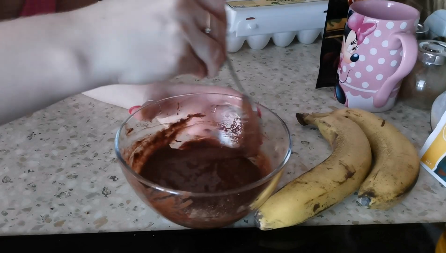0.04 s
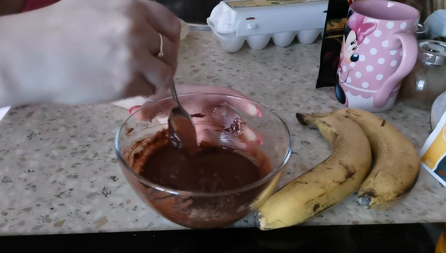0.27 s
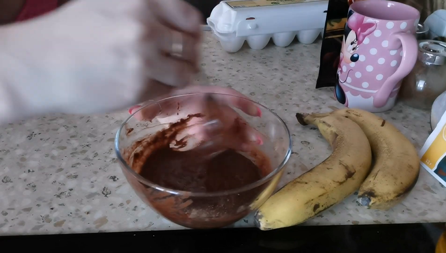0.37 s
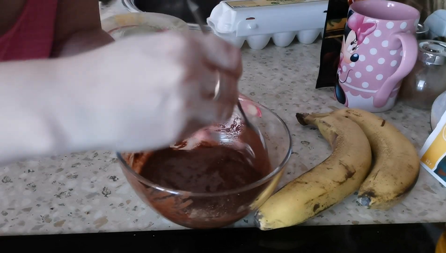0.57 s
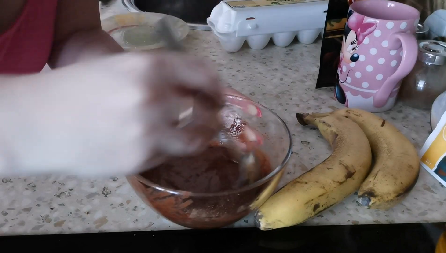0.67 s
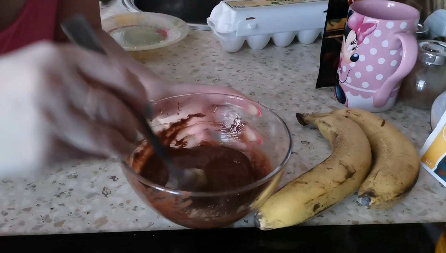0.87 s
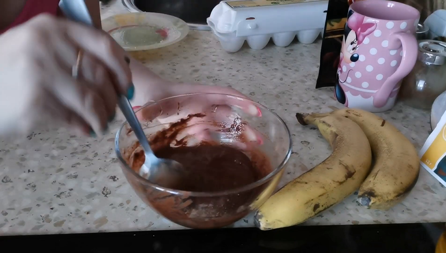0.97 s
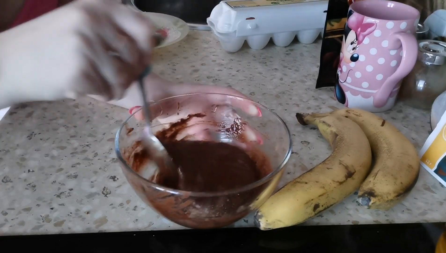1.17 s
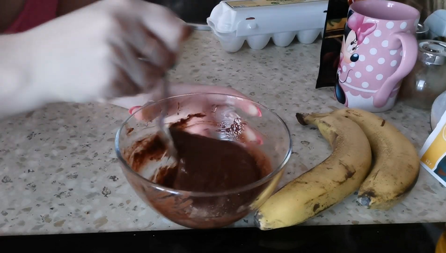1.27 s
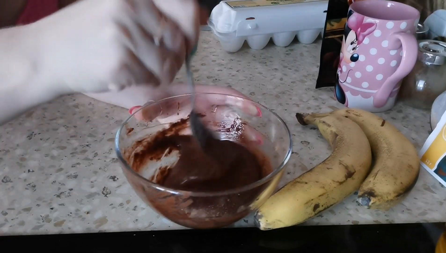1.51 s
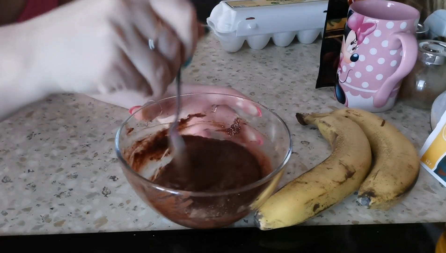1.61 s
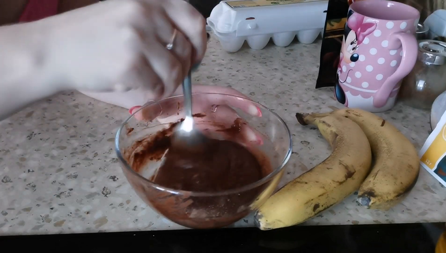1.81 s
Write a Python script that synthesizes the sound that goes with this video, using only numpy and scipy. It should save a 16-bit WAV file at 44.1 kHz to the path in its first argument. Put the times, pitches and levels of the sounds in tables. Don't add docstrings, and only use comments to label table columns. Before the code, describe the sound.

A metal spoon clinks on a glass bowl damped by batter: a sharp, bright knock at about 0.2 seconds, then a softer, duller one near 0.7, each with a short ring and kitchen reverberation. Tiny wet ticks come around 0.4, and faint scraping, rubbing and sticky ticks run from 0.8 to 1.45, nearly stopping before a last slight touch at 1.7. A low fridge-like hum continues underneath.

```python
import sys
import numpy as np
from scipy import signal
from scipy.fft import rfft, irfft
from scipy.io import wavfile
from scipy.ndimage import uniform_filter1d

SR = 44100
rng = np.random.default_rng(int(sys.argv[2]) if len(sys.argv) > 2 else 0)


def convert_level_to_amplitude(level_db):
    exponent = np.asarray(level_db, float) / 20
    return 10 ** exponent


def transcribe(signal):
    frames = np.atleast_2d(signal).T
    limited = np.clip(frames, -1, 1)
    pcm = np.round(limited * 32767).astype(np.int16)
    wavfile.write(sys.argv[1], SR, pcm)


N = 81585
FLICKER_DB = 1.2


def on_log(hz, table):
    tab = np.array(table, float)
    return np.interp(np.log(np.maximum(hz, 1)), np.log(tab[:, 0]), tab[:, 1])


def on_time(table):
    tab = np.array(table, float)
    return np.interp(np.arange(N) / SR, tab[:, 0], tab[:, 1])


def band(x, hz, width):
    return signal.lfilter(*signal.iirpeak(min(hz, SR / 2.2), hz / width, fs=SR), x)


def colour(x, table, size=1024):
    hz = np.arange(size // 2 + 1) * SR / size
    cepstrum = irfft(np.log(convert_level_to_amplitude(on_log(hz, table))))
    cepstrum[1:size // 2] *= 2
    cepstrum[size // 2 + 1:] = 0
    response = irfft(np.exp(rfft(cepstrum)))
    return signal.fftconvolve(x, response)[:len(x)]


def walk(rate):
    k = int(SR / rate)
    steps = np.repeat(rng.standard_normal(N // k + 1), k)
    return uniform_filter1d(uniform_filter1d(steps, k), k)[:N]


def pair(hz, size):
    alike = 0.67 / (1 + (hz / 355.8) ** 2)
    mid, side = rng.standard_normal((2, size))
    opposite = np.array([[1], [-1]])
    return (np.sqrt(1 + alike) * mid + np.sqrt(1 - alike) * side * opposite) / np.sqrt(2)


def pan(db):
    return convert_level_to_amplitude(db * np.array([[.5], [-.5]]))


def modes(at, rows, rise):
    t = np.maximum(np.arange(N) / SR - at, 0)
    tones = []
    for hz, db, t60 in rows:
        fade = np.exp(-np.log(1000) * t / t60)
        swell = 1 - np.exp(-t / rise(hz))
        tones.append(convert_level_to_amplitude(db) * np.sin(2 * np.pi * hz * t) * fade * swell)
    return tones


# pitch in Hz, level in dB per Hz.
AIR_COLOUR = [(25, -5.5), (33, -5), (50, 2), (75, -9.5), (130, 3), (250, -9), (1000, -18), (3000, -24.5),
              (14000, -44.5)]


def air():
    out = 0
    for hz in 25 * 2 ** np.arange(0, 9.4, 1 / 3):
        level = convert_level_to_amplitude(on_log(hz, AIR_COLOUR) + FLICKER_DB * walk(15.0))
        out = out + level * band(band(pair(hz, N), hz, hz / 3), hz, hz / 3)
    return out / out.std() * convert_level_to_amplitude(-55)


# time in seconds, level in dB.
STIR_EFFORT = [(0, -73), (.3, -77), (.37, -69), (.44, -69), (.5, -77.5), (.8, -66.5), (.88, -77.5),
               (1., -64), (1.05, -76.5), (1.12, -71.5), (1.2, -70), (1.28, -71.5), (1.35, -67),
               (1.43, -71.5), (1.47, -85), (1.69, -83.5), (1.72, -74), (1.76, -111)]
# pitch in Hz, width in Hz, level in dB.
SCRAPE_BODY = [(309, 27, 5), (697, 31, 1.5), (960, 75, 7), (4460, 1000, 0.5), (7800, 2700, -5.5),
               (10800, 3000, -4.5)]


def scrape():
    slips_per_s, scatter_db = 2700, 3
    chance, size, sign = rng.random((2, 3, N)).transpose(1, 0, 2)
    happens = chance < slips_per_s / SR
    slips = happens * convert_level_to_amplitude(-scatter_db * np.log(size + 1e-9)) * np.sign(sign - .5)
    slips = slips / slips.std() + rng.standard_normal((2, N))
    out = 0
    for hz, width, db in SCRAPE_BODY:
        even_out = np.sqrt(SR / 2 / width) / 2
        out = out + convert_level_to_amplitude(db + FLICKER_DB * walk(22.4)) * even_out * band(slips, hz, width)
    return convert_level_to_amplitude(on_time(STIR_EFFORT)) * out


# pitch in Hz, time to fall by 60 dB in seconds.
ROOM_FADE = [(100, 1), (300, 0.68), (700, 0.83), (1800, 0.64), (4800, 0.5475), (12800, 0.22)]
# pitch in Hz, level in dB.
ROOM_TONE = [(100, -3), (400, 9.5), (800, -5), (2000, 3), (2400, 3.5), (2950, -10), (3500, -7), (4300, -5),
             (7000, -2.5), (13000, -2.5)]


def kitchen(size=30000):
    t = np.arange(size) / SR
    end = 1 + np.exp(np.minimum((t - 0.016) / 0.0012, 50))
    sparse = rng.standard_normal((2, size)) ** 3 * np.exp(-t / 0.032) / end
    early = convert_level_to_amplitude(-1.5) * sparse * (t > .0004) / np.sqrt(np.sum(sparse ** 2) / 2)
    late = 0
    for hz in 80 * 2 ** np.arange(0, 7.8, 1 / 4):
        build = 1 - np.exp(-t * hz / 1.8)
        fade = np.exp(-np.log(1000) * t / on_log(hz, ROOM_FADE)) * build
        late = late + convert_level_to_amplitude(on_log(hz, ROOM_TONE)) * band(pair(hz, size) * fade, hz, hz / 5)
    return early, late / np.sqrt(SR / 100)


def arrivals(echoes, lag_ms, size=2400):
    n = np.arange(size)
    lags = np.array([[0], [lag_ms]])
    out = 0
    for k, (ms, left_db, right_db) in enumerate([(0, 0.0075, 0)] + list(echoes)):
        gain = convert_level_to_amplitude(np.array([[left_db], [right_db]]))
        out = out + (-1) ** k * gain * np.sinc(n - 16 - (ms + lags) * SR / 1000)
    return out


def heard(crack, ring, near, early, late, room_db):
    x = (crack + ring)[None]
    direct = signal.fftconvolve(x, near, axes=1)[:, 16:N + 16]
    to_room = (crack + convert_level_to_amplitude(-1.5) * ring)[None]
    room = signal.fftconvolve(to_room, convert_level_to_amplitude(room_db) * late, axes=1)
    return direct + (signal.fftconvolve(x, early, axes=1) + room)[:, :N]


def knock(at, db, modes_db, lead_db, rows, click):
    n = np.arange(N)
    lead_s, swell_cycles = 0.00091, 0.49
    lead_noise = rng.standard_normal(N) * np.exp(np.minimum(n / SR - at, 0) / lead_s) * (n < at * SR)
    crack = colour(np.sinc(n - at * SR) + convert_level_to_amplitude(lead_db) * lead_noise, click)
    tones = modes(at, rows, lambda hz: swell_cycles / hz)
    ring = sum((-1) ** k * tone for k, tone in enumerate(tones))
    return convert_level_to_amplitude(db) * crack, convert_level_to_amplitude(db + modes_db) * ring


# start in seconds, level in dB, tones in dB, room in dB, lead-in noise in dB.
KNOCK_LIST = [
    (0.2113, -2.5, -14.5, -8, -28),
    (0.6758, -7, -17, -6.5, -18.5),
]
# pitch in Hz, level in dB, time to fall by 60 dB in seconds.
RIM_TONES = [(300, -29.5, 0.039), (397, -22.5, 0.046), (743, -10.5, 0.029), (800, -10, 0.042),
             (938, -17.5, 0.1), (1190, -11.5, 0.015), (2270, -9.5, 0.011), (2807, -7, 0.015),
             (3303, 1.5, 0.023), (3724, 4, 0.0094), (4880, 5, 0.0084), (5620, -1, 0.011),
             (6980, -1.5, 0.0073), (10700, -8.5, 0.004)]
WALL_TONES = [(313.7, -20.5, 0.066), (443, -20, 0.024), (705, -9.5, 0.047), (883, -13.5, 0.035),
              (1097.5, -10.5, 0.062), (1689, -14, 0.044), (3360, 8, 0.014), (3854, -5.5, 0.032),
              (4280, 1.5, 0.014), (4910, -2.5, 0.012), (6830, 0.5, 0.023), (7710, -12.5, 0.028),
              (8170, -14.5, 0.027), (10700, -1.5, 0.0061)]
# pitch in Hz, level in dB.
RIM_CLICK_COLOUR = [(150, -37.5), (500, -24), (1400, -14.5), (2300, -27), (3500, -6), (4300, 1), (5800, 6),
                    (13000, 6.5)]
WALL_CLICK_COLOUR = [(150, -63), (500, -11.5), (1400, -0.5), (2500, -5), (3500, -18), (5500, 8), (7500, 10),
                     (13000, 6.5)]
# delay in ms, left level in dB, right level in dB.
RIM_BOUNCES = [(.9, -5, 1.5), (1.7, -8, -2), (2.6, -7.5, -9.5), (3.6, -19.5, -5.5), (4.7, -11, -9.5),
               (6.6, -15.5, -14.5), (7.7, -11, -8.5), (8.7, -10.5, -10), (9.7, -6.5, -5),
               (11.7, -14.5, -9.5)]
WALL_BOUNCES = [(0.884, -4, -6.5), (1.78, -4.5, -15), (2.815, -10.5, -4), (3.823, -3, -3),
                (4.827, -9.5, -8), (5.68, -6.5, -10.5), (7.646, -9.5, -7), (8.83, -14.5, -7.5),
                (10.56, -15, -10), (12.29, -17, -8.5), (14.26, -19.5, -11.5), (41, -22, -17)]
RIGHT_LAGS = [0.064, 0.028]


def knocks(early, late):
    bodies = [(RIM_TONES, RIM_CLICK_COLOUR, RIM_BOUNCES), (WALL_TONES, WALL_CLICK_COLOUR, WALL_BOUNCES)]
    out = 0
    for (at, db, modes_db, room_db, lead_db), body, lag_ms in zip(KNOCK_LIST, bodies, RIGHT_LAGS):
        tones, click, echoes = body
        crack, ring = knock(at, db, modes_db, lead_db, tones, click)
        out = out + heard(crack, ring, arrivals(echoes, lag_ms), early, late, room_db)
    return out


# start in seconds, pitch in Hz,
# level in dB, time to fall by 60 dB in seconds, left-right difference in dB.
FREE_RINGS = [(.2118, 1727, -24, .07, 8), (.2118, 1688, -28, .19, 8), (.2118, 1698, -36.5, .5, 8),
              (.2118, 1712.5, -55.5, 1.18, 8), (.2118, 1694.5, -38.5, .48, 8), (.2118, 712, -47, .8, 2),
              (.2118, 727, -48, .85, 0), (.2118, 785, -40, .25, -2), (.2118, 920, -46, .5, 0),
              (.2118, 415, -48, .37, 0), (.232, 113, -42, .2, 0), (.6759, 412, -44, .5, -3),
              (.6759, 424, -47, .4, -3), (.6759, 660, -44, .3, -5), (.6759, 323, -50, .5, -3),
              (.694, 113, -36, .12, -3), (.6759, 104, -50, 1.2, -4), (.6759, 129, -53, 1.2, -4),
              (.6759, 152, -52, .6, -3), (.6759, 3320, -36, .25, -4), (.6759, 3345, -42, .3, -4),
              (.6759, 3770, -42, .35, -2), (.6759, 3500, -44, .35, -2)]


def rings():
    out = 0
    for at, hz, db, t60, pan_db in FREE_RINGS:
        out = out + modes(at, [(hz, db, t60)], lambda hz: .008)[0] * pan(pan_db)
    return out


# start in seconds, peak level in dB, pitch in Hz,
# left-right difference in dB, length in seconds.
WET_TICKS = [(0.369, -48, 10100, 15, 0.003), (0.381, -45.5, 10700, -4, 0.0069),
             (0.417, -50.5, 11000, 5, 0.003), (0.428, -49.5, 10700, -1, 0.0035),
             (0.893, -52, 5900, -11, 0.0032), (0.964, -52, 7800, -1.5, 0.0028),
             (1.025, -54, 8440, -17, 0.0024), (1.043, -58, 5000, -3, 0.0038),
             (1.3475, -57, 14500, 2.5, 0.0023), (1.034, -46.5, 8200, -2, 0.014),
             (1.056, -49.5, 4880, -10.5, 0.0019), (1.121, -59, 10700, 9, 0.0041),
             (1.1633, -60, 10800, 3, 0.0033), (1.2164, -57, 7450, 1, 0.0043),
             (1.276, -48.5, 10700, 4, 0.0034), (1.2884, -68, 10800, 4, 0.0022),
             (1.301, -59, 10800, 10, 0.003), (1.351, -49.5, 10800, 3, 0.003),
             (1.394, -51.5, 10700, -7, 0.0057), (1.412, -46.5, 12200, 4, 0.0053),
             (1.443, -52, 11490, -3, 0.0031), (1.709, -63, 8200, -12, 0.0042),
             (1.728, -59, 4040, -11, 0.0038)]


def ticks(early, late):
    out = np.zeros((2, N))
    t = np.arange(2000) / SR
    for at, db, hz, pan_db, length in WET_TICKS:
        shape = np.exp(-t / length) * (1 - np.exp(-t / 0.0013))
        pop = band(rng.standard_normal(len(t)) * shape, hz, hz * 0.41)
        i = int(at * SR)
        out[:, i:i + len(t)] += pop / np.abs(pop).max() * convert_level_to_amplitude(db) * pan(pan_db)
    return out + signal.fftconvolve(out, convert_level_to_amplitude(-12) * late, axes=1)[:, :N]


# start in seconds, length in seconds, pitch in Hz,
# width in Hz, level in dB.
SPOON_RUBS = [(0.514, 0.18, 4280, 300, -66), (0.88, 0.097, 5620, 254, -64.5),
              (0.892, 0.082, 7800, 300, -66.5), (1.005, 0.17, 4700, 200, -64.5),
              (1.02, 0.12, 10700, 900, -67), (1.024, 0.02, 7860, 500, -59), (1.076, 0.26, 154, 24.6, -55.5),
              (1.192, 0.12, 933, 80.3, -65.5), (1.196, 0.061, 11800, 250, -69.5),
              (1.265, 0.094, 10800, 500, -73), (1.328, 0.13, 960, 90, -68.5)]


def rubs():
    t = np.arange(N) / SR
    out = 0
    for at, length, hz, width, db in SPOON_RUBS:
        tone = np.sqrt(SR / 2 / width) * band(band(pair(hz, N), hz, width), hz, width)
        swell = np.sin(np.pi * np.clip((t - at) / length, 0, 1) ** 0.54)
        out = out + convert_level_to_amplitude(db) * tone * swell * convert_level_to_amplitude(2.6 * walk(40.4))
    return out


def scene():
    early, late = kitchen()
    stirring = scrape() + ticks(early, late) + rubs()
    return air() + knocks(early, late) + rings() + stirring


def low_pass(x):
    return signal.sosfilt(signal.butter(12, 16810, fs=SR, output="sos"), x)


# time in seconds, left-right difference in dB.
CAMERA_TURN = [(0, 0), (.6, 3), (.72, -2), (1.85, -1)]
# pitch in Hz, level in dB.
LEFT_COLOUR = [(4500, -1.5), (6800, -6.5), (7950, -31), (8900, -1.5), (10700, 12.5), (11600, 3.5),
               (13500, 2), (15000, -19)]
RIGHT_COLOUR = [(4500, 0.5), (6000, 3), (8200, 7), (9400, -0.5), (10000, -23.5), (11500, -15),
                (13500, -16.5), (15000, -52)]


def record(dry):
    ports = np.array([colour(dry[0], LEFT_COLOUR), colour(dry[1], RIGHT_COLOUR)])
    ports = ports * pan(on_time(CAMERA_TURN))
    hiss = convert_level_to_amplitude(-72) * band(rng.standard_normal(dry.shape), 13000, 4000.)
    top = signal.butter(7, 15000, fs=SR, output="sos")
    return low_pass(signal.sosfilt(top, ports + hiss))


dry = scene()
out = record(dry)
transcribe(out)
```